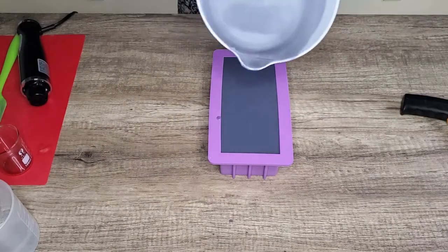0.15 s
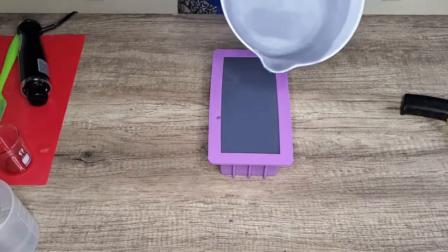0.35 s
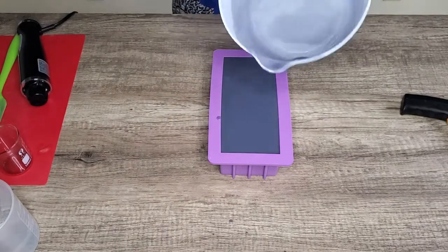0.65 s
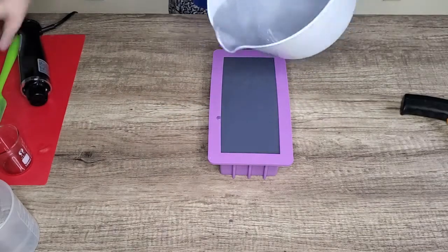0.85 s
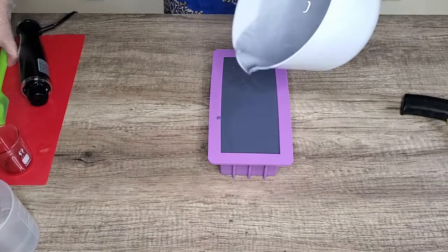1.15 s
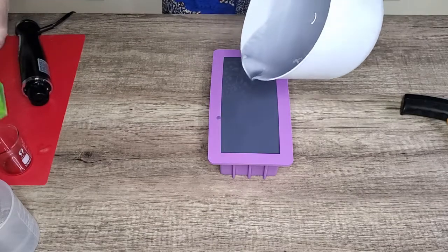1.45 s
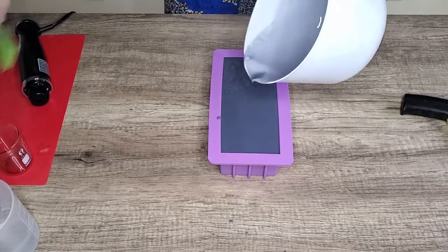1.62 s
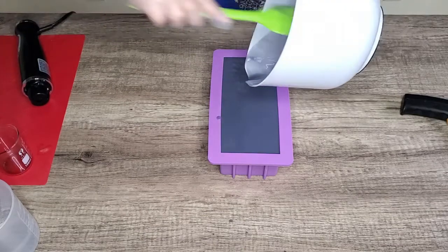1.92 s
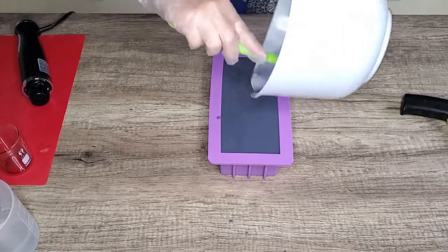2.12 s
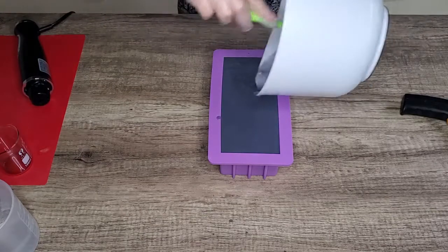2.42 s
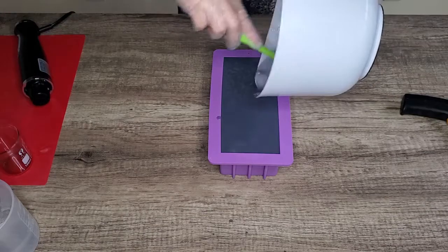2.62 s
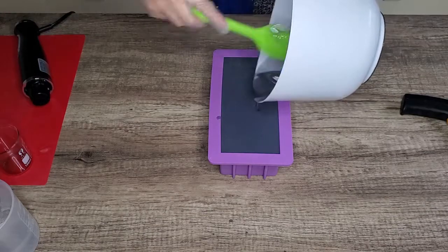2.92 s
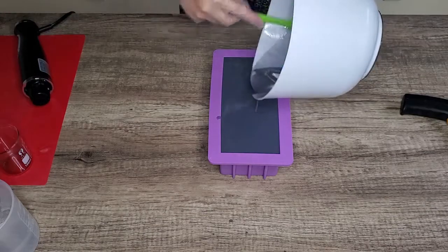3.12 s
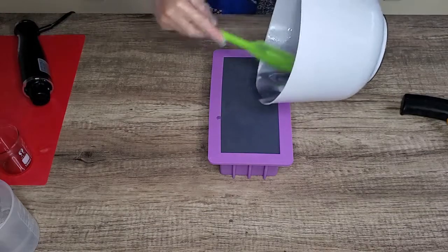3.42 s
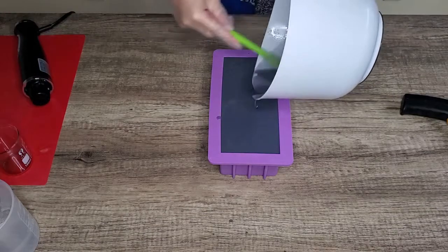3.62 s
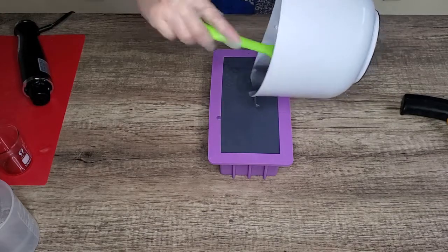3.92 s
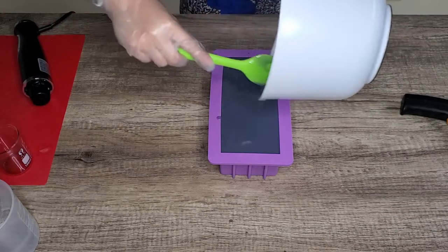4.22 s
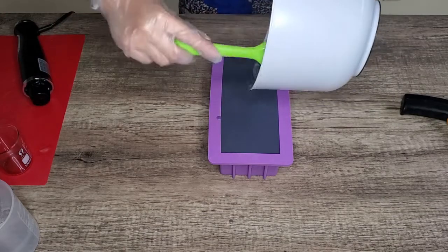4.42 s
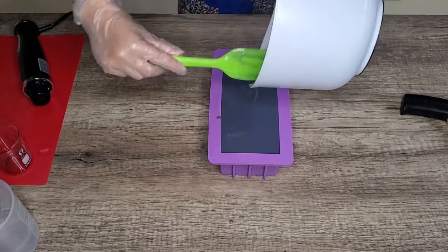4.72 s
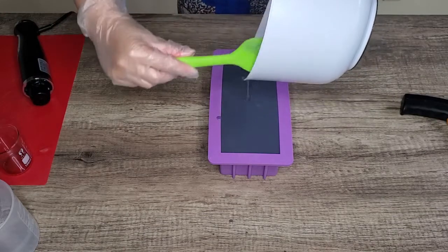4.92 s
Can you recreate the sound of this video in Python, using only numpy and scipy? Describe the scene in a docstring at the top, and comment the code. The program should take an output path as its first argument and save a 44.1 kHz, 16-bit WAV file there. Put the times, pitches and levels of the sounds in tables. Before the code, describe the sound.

Sleeves and gloves rustle softly as a plastic mixing bowl is tipped. A spatula is dragged off a mat with a sharp clack and a brief shudder. Its silicone blade then bumps the bowl about every half second in dull, hollow knocks, with a few thin clinks. Near the end the sliding blade makes the bowl hum briefly. The room is small, with low rumble and faint microphone hiss.

```python
"""Sleeves and gloves rustle as a cook tips a plastic mixing bowl over a mould. A spatula is dragged
off a mat with a clack and a shudder, then scrapes the bowl out: its silicone blade bumps the wall in
dull, ringing knocks that shake the table and that the small room carries on. A few thin clinks fall
among them, and near the end the sliding blade makes the wall hum.
A low room rumble and faint microphone hiss lie underneath."""
import sys
import numpy as np
from scipy import signal
from scipy.fft import rfft, irfft, next_fast_len
from scipy.io import wavfile

SR = 44100
rng = np.random.default_rng(int(sys.argv[2]) if len(sys.argv) > 2 else 0)


def file_out(sig):
    """Save sig as 16-bit WAV at sys.argv[1]."""
    # one column per channel
    cols = np.atleast_2d(sig).T
    # limit, then scale
    lim = np.clip(cols, -1, 1)
    pcm = np.round(lim * 32767).astype(np.int16)
    wavfile.write(sys.argv[1], SR, pcm)


N = 223078

THUD_HZ, RIM_HZ, CLACK_HZ = 181, 606, 1280
THUD_Q, KNOCK_Q, RIM_Q, CLACK_Q, TICK_Q = 1.78, 1.33, 3.43, 2.24, 2.37   # centre over width
BLADE_LAG_S = 0.001215   # the soft blade lands before its stiff core does
WALL_SWELL_S, SILICONE_CUTOFF_HZ = 0.032, 4100
# Modes of the bowl wall: f/Hz, level/dB, t60/s
WALL_MODES = [(337, -6, 0.29), (414.3, -3, 0.33), (443.4, 0, 0.18), (480.8, 0, 0.15), (502.1, -2.5, 0.39),
              (520, -9.5, 0.36), (638, 1.5, 0.034), (710, -11, 0.055), (946, -14.5, 0.055)]
# Spatula hits, each layer trimmed against the hit's level: t/s, level/dB, thud/dB, knock/dB,
# knock f/Hz, rim/dB, clack/dB, tick/dB, tick f/Hz, wall ring/dB, table shudder/dB, left over right/dB
HITS = [(0.664, -44, -1, 1.5, 500, -18, -2, -16, 2630, -31, -15, -3),
        (1.111, -29, -14.5, -11.5, 304, -8, -22, -5.5, 2500, -18, -34, 0),
        (2.122, -32, -3, 3, 291, -7, -4, 2, 2356, -24, -12.5, 2.5),
        (2.187, -71, -34, -15, 404, -27.5, -26, 4, 2240, -19, -9, 9),
        (2.562, -25.5, -50, 0, 648, -9, -31, -14, 1760, -1, -39.5, 2.5),
        (2.656, -48.5, -1.5, -21, 403, -21.5, -32.5, -24.5, 2500, -15.5, -13, 6),
        (3.155, -39.5, -5.5, 2.5, 285, -6.5, -5, 2.5, 2310, -18.5, -13.5, 3.5),
        (3.207, -56.5, -19, 2, 394, -5, 6.5, -8, 3340, -33, -22, -2),
        (3.692, -33, -11, 3.5, 282, -1.5, -3, -3.5, 2360, -18.5, -17.5, 3.5),
        (4.052, -41.5, -3.5, -1, 282, -8, -7.5, -11, 2300, -41, -12, 0.5),
        (4.525, -52.5, 1.5, -4.5, 725, -0.5, -16, -12.5, 2480, -18, -12.5, 2),
        (4.59, -61, -7, -19, 600, -24, -30, -10, 2460, -8, -9, 0),
        (4.729, -61.5, -22, -4, 685, -11, -4, -12, 2600, -11, -16, 5),
        (5.006, -46.5, -3, 2.5, 386, -7, -6, -28, 2700, -35, -17, 3)]
def bowl_knocks():
    """Each spatula hit is five heavily damped resonances plus the longer ring of the bowl wall."""
    out, clicks = np.zeros((2, N)), np.zeros(N)
    for s, level_db, *layers, ring_db, _, pan_db in HITS:
        thud_db, knock_db, knock_hz, rim_db, clack_db, tick_db, tick_hz = layers
        hit = from_db(thud_db) * blow(THUD_HZ, THUD_HZ / THUD_Q)
        hit += from_db(knock_db) * blow(knock_hz, knock_hz / KNOCK_Q)
        hit += from_db(rim_db) * blow(RIM_HZ, RIM_HZ / RIM_Q)
        clack = from_db(clack_db) * blow(CLACK_HZ, CLACK_HZ / CLACK_Q)
        tick = from_db(tick_db) * blow(tick_hz, tick_hz / TICK_Q)
        add(hit, BLADE_LAG_S, tick - clack)   # opposite signs, so no hole opens between them
        pan = np.array([[.5], [-.5]]) * pan_db
        add(out, s, -hit * from_db(level_db + pan))
        clicks[round(s * SR)] = from_db(level_db + ring_db)
    # the batter-coated wall takes a moment to come up to full swing
    wall = sum(from_db(db) * (ring(clicks, hz, t60) - ring(clicks, hz, WALL_SWELL_S))
               for hz, db, t60 in WALL_MODES)
    # a free wall radiates no deep bass
    out += signal.sosfilt(signal.butter(3, [300, 1100], "band", fs=SR, output="sos"), wall)
    # soft silicone excites no treble
    return signal.sosfilt(signal.butter(4, SILICONE_CUTOFF_HZ, fs=SR, output="sos"), out)


# Tone of the shaken table top: f/Hz, level/dB
TABLE_TONE = [(50, -3), (76, 0.5), (110, -3.5), (160, -20.5)]
def table_shudder():
    """Every knock sends a brief low shudder through the table top."""
    envelope = sum(from_db(level_db + shudder_db) * swell(s + 0.0046, rise=1500, hold_s=0, fall=167)
                   for s, level_db, *_, shudder_db, _ in HITS)
    return envelope * stereo_noise(TABLE_TONE)


# Tones of the drag's four layers: f/Hz, level/dB
SHUDDER_TONE = [(55, -7), (75, 0), (130, -18), (245, 1), (280, -16), (320, 3.5), (420, -18.5), (700, -51)]
RATTLE_TONE = [(360, -15), (430, 6.5), (510, -9.5), (600, 7.5), (700, -7.5), (800, 2.5), (900, -10),
               (1000, 1), (1130, -16), (1270, -8.5), (1600, -8.5), (2200, -24)]
CLACK_TONE = [(1800, -16.5), (2400, -10.5), (2750, -1), (3100, -9.5), (3450, -5), (4000, -48)]
DRAG_HISS_TONE = [(2240, -44), (3800, -1.5), (6870, -9.5), (10200, -11), (13000, -17.5), (14000, -23),
                  (15700, -20)]
# Release of shudder, rattle, clack and hiss: fall/(dB/s) each
DRAG_RELEASES = [166, 166, 140.4, 184]
# Four jerks off the mat: t/s, rise/(dB/s), hold/s, shudder/dB, rattle/dB, clack/dB, hiss/dB
JERKS = [(1.045, 9000, 0.026, -45.5, -49, -44.5, -51), (1.108, 1504, 0.017, -40, -67, -66, -60),
         (1.163, 400, 0.01, -61, -46, -58.5, -57.5), (1.185, 302, 0.027, -44, -43.5, -73, -65.5)]
def spatula_drag():
    """The handle clacks and the table top and mat shudder while the spatula comes away."""
    tones = SHUDDER_TONE, RATTLE_TONE, CLACK_TONE, DRAG_HISS_TONE
    out = 0
    for layer, (tone, fall) in enumerate(zip(tones, DRAG_RELEASES)):
        power = sum((from_db(levels_db[layer]) * swell(s, rise, hold_s, fall)) ** 2
                    for s, rise, hold_s, *levels_db in JERKS)
        out = out + np.sqrt(power) * stereo_noise(tone)
    flutter = from_db(1.05 * drift(54))
    return flutter * out


# Thin, bright contacts: t/s, level/dB, f/Hz, width/Hz
CLINK_HITS = [(0.986, -55.5, 9700, 3000), (1.044, -29.5, 4900, 3000), (2.189, -54, 4530, 3000),
              (3.156, -65.5, 3620, 900), (2.643, -56.5, 3620, 700), (2.643, -56, 9460, 704),
              (2.679, -76, 9500, 690), (3.208, -66, 5000, 1500)]
def clinks():
    """Tiny hard contacts each strike one high, short resonance."""
    out = np.zeros(N)
    for s, level_db, hz, width_hz in CLINK_HITS:
        add(out, s, from_db(level_db) * blow(hz, width_hz))
    return out


RASP_EDGE_RATIO, RASP_EDGE_DB = 0.59, -9   # the rasp band's edges against its centre
# Tones of the cloth, its body and the air on top: f/Hz, level/dB
CLOTH_BODY = [(900, -15), (1500, -4.5), (2200, -4), (2750, 0.5), (3150, -10), (3650, -1.5), (4300, -6.5),
              (5800, -8), (6600, -5), (7300, -9), (9000, -14), (15000, -9.5)]
CLOTH_AIR = [(4000, -17.5), (6500, -16), (9000, -3), (12000, -4), (16500, -17.5)]
# Sleeve and glove rubs, air and rasp trimmed against the level:
# t/s at full level, rise/(dB/s), hold/s, level/dB, air/dB, rasp f/Hz, rasp/dB
CLOTH_RUBS = [(0.076, 88, 0.09, -61, -4, 3270, 4.5), (0.256, 55, 0.11, -65, -4.5, 2730, -1.5),
              (0.403, 75, 0.03, -63.5, -7, 3250, 0), (0.548, 202, 0.048, -58, -3.5, 3250, -1.5),
              (0.662, 204, 0.012, -52, -4.5, 3430, -4.5), (0.902, 98, 0.04, -73.5, -1, 3880, -0.5),
              (1.39, 117, 0.017, -70.5, 1.5, 4970, 4.5), (1.523, 100, 0.037, -86, 1, 5130, 8.5),
              (1.682, 250, 0.045, -90, 2, 5000, 13.5), (1.862, 400, 0.02, -79, -17, 5500, 9),
              (1.894, 200, 0.027, -78, 0, 4000, 10), (2.197, 297, 0.02, -81, 2, 2510, 11.5)]
def cloth_rustle():
    """Fibres slide over each other: each rub is fluttering hiss with its own rasp and share of air."""
    lean_left = from_db([[1.5], [-1.5]])
    body = stereo_noise(CLOTH_BODY) * from_db(1.06 * drift(26)) * lean_left
    air = stereo_noise(CLOTH_AIR) * from_db(1.1 * drift(25))
    body_power, air_power, rasp = 0, 0, 0
    for s, rise, hold_s, level_db, air_db, hz, rasp_db in CLOTH_RUBS:
        envelope = from_db(level_db) * swell(s, rise, hold_s, fall=183)
        body_power += envelope ** 2
        air_power += (envelope * from_db(air_db)) ** 2
        rasp_tone = [(hz * RASP_EDGE_RATIO, RASP_EDGE_DB), (hz, 0), (hz / RASP_EDGE_RATIO, RASP_EDGE_DB)]
        rasp += envelope * from_db(rasp_db) * stereo_noise(rasp_tone)
    return rasp + np.sqrt(body_power) * body + np.sqrt(air_power) * air


# Tones of the wall's lower and upper hum, one list each: f/Hz, level/dB
HUM_TONES = [
    [(480, -13), (545, 34), (610, -28)],
    [(650, -30), (740, 23), (830, -30)],
]
# Blade strokes along the wall: t/s, rise/(dB/s), hold/s, lower hum/dB, upper hum/dB
STROKES = [(4.253, 2000, 0.11, -98, -79), (4.397, 200, 0.089, -70.5, -89)]
def blade_slide():
    """Friction of the blade feeds two resonances of the wall."""
    lower, upper = [stereo_noise(tone) for tone in HUM_TONES]
    out = 0
    for s, rise, hold_s, lower_db, upper_db in STROKES:
        hum = from_db(lower_db) * lower + from_db(upper_db) * upper
        out += swell(s, rise, hold_s, fall=290) * hum
    return out


ROOM_RISE_S, ROOM_FADE_S = 0.00064, 0.41
EARLY_BOOST, EARLY_S = 0.14, 0.004
BAND_EDGES_HZ = 25 * 2 ** np.arange(0, 9.7, 1 / 3)   # third octaves
# Decay of the small room, before the late fade: f/Hz, t60/s
ROOM_DECAY = [(100, 0.19), (400, 0.43), (1500, 0.43), (3500, 0.39), (5000, 0.36), (10000, 0.4)]
def room(sound):
    """Dense reflections build up quickly and die band by band; they change as the bowl is moved."""
    t = np.arange(SR // 2) / SR
    hit_times = np.array(HITS)[:, 0]
    # a fresh echo pattern starts just ahead of each knock that follows a pause
    changes = [int((s - .005) * SR) for s, gap in zip(hit_times[1:], np.diff(hit_times)) if gap > .25]
    bounds = [0] + changes + [N]
    noise = stereo_noise([(55, 0), (18000, 0)])
    offsets = np.arange(len(bounds)) * (N // len(bounds))
    patterns = np.array([np.roll(noise, -at, axis=1)[:, :len(t)] for at in offsets])
    tails = 0
    for low, high in zip(BAND_EDGES_HZ, BAND_EDGES_HZ[1:]):
        band = signal.sosfilt(signal.butter(2, [low, high], "band", fs=SR, output="sos"), patterns)
        t60 = at_hz(ROOM_DECAY, np.sqrt(low * high))
        tails += band * from_db(-60 * t / t60)
    tails *= 1 - np.exp(-t / ROOM_RISE_S)
    tails *= np.exp(-2 * (t / ROOM_FADE_S) ** 2)   # the late tail falls faster
    tails *= 1 + EARLY_BOOST * np.exp(-t / EARLY_S)   # strong first echoes off the table and bowl
    send = sound.mean(axis=0, keepdims=True)
    out = np.zeros((2, N))
    for start, end, tail in zip(bounds, bounds[1:], tails):
        add(out, start / SR, signal.fftconvolve(send[:, start:end], tail, axes=1))
    return out


# Tones of the rumble's body and its sub: f/Hz, level/dB
RUMBLE_BODY = [(90, -15.5), (125, -4.5), (190, 0), (220, -4), (250, -1.5), (320, -2.5), (460, -12),
               (525, -2.5), (620, -14), (730, -8.5), (950, -24), (1300, -20), (1800, -31), (2600, -32.5)]
RUMBLE_SUB = [(27, -3.5), (35, 1.5), (45, -7.5), (60, -16), (76, -3.5), (90, -17), (110, -16.5)]
# Fader ride of the rumble, louder while the bowl is being shifted: t/s, body/dB, sub/dB
RUMBLE_RIDE = [(0.0, -67, -63.5), (0.15, -63.5, -55), (0.35, -61, -59), (0.49, -66, -63), (0.6, -59.5, -59),
               (0.8, -61, -56), (1.0, -62, -63.5), (1.2, -60, -59), (1.38, -61.5, -67), (1.6, -64.5, -64.5),
               (2.2, -66.5, -64), (2.5, -68.5, -72), (2.68, -57, -57.5), (2.8, -67, -70),
               (3.3, -66.5, -61.5), (3.62, -67.5, -66.5), (4.1, -68.5, -67), (4.7, -68.5, -66),
               (5.06, -64, -64.5)]
def house_rumble():
    """The house rumbles: a lumpy body of low noise over a deep sub."""
    body_db, sub_db = in_time(RUMBLE_RIDE)
    body = from_db(body_db + 1.5 * drift(6)) * stereo_noise(RUMBLE_BODY)
    return body + from_db(sub_db) * stereo_noise(RUMBLE_SUB)


# Tone of the microphone's noise floor: f/Hz, level/dB
MIC_TONE = [(880, -39), (1500, -20), (1670, -0.5), (1970, -22), (2070, -8.5), (2680, -7), (3850, -7.5),
            (5540, -11), (6610, -9.5), (7430, -15), (11000, -11), (15700, -10.5)]
def microphone_hiss():
    """The microphone adds a faint, steady hiss of its own."""
    return from_db(-82) * stereo_noise(MIC_TONE)


# Stereo image, near mono in the bass and wide in the treble: f/Hz, left-right correlation
STEREO_IMAGE = [(30, 0.96), (125, 0.81), (350, 0.86), (600, 0.5), (900, 0.2), (1200, 0.033), (4000, 0.034),
                (12000, 0.054)]
def stereo_noise(tone):
    """Stereo noise of rms 1; the tone curve shapes its spectrum, which is empty beyond the ends."""
    size = next_fast_len(N)
    hz = np.maximum(np.arange(size // 2 + 1) * SR / size, 1)
    inside = (hz > tone[0][0]) & (hz < tone[-1][0])
    mid, side = rfft(rng.standard_normal((2, size))) * from_db(at_hz(tone, hz)) * inside
    alike = np.clip(at_hz(STEREO_IMAGE, hz), 0, 1)
    mid, side = mid * np.sqrt(1 + alike), side * np.sqrt(1 - alike)
    return rms_one(irfft(np.array([mid + side, mid - side]), size)[:, :N])


def ring(clicks, hz, t60):
    """A unit click sets a decaying sine of height 1 ringing."""
    r, w = from_db(-60 / (t60 * SR)), 2 * np.pi * hz / SR
    return signal.lfilter([0, np.sin(w)], [1, -2 * r * np.cos(w), r * r], clicks + 1e-18)


def blow(hz, width_hz):
    """A click through a heavily damped resonance, twice for steep skirts; peak 1."""
    click = signal.unit_impulse(2048)
    t60 = np.log(1000) / (np.pi * width_hz)
    shape = np.gradient(ring(ring(click, hz, t60), hz, t60))   # a small body radiates no steady push
    return shape / np.abs(shape).max()


def swell(s, rise, hold_s, fall):
    """Envelope that climbs to 1 at time s, holds and falls away, on straight slopes in dB per second."""
    t = np.arange(N) / SR - s
    attack_db = rise * np.minimum(t, 0)
    release_db = fall * np.minimum(hold_s - t, 0)
    return from_db(np.maximum(np.minimum(attack_db, release_db), -200))


def drift(rate_hz):
    """Smooth random wobble of spread about 1, rolling off above the rate."""
    step, settle = 40, 2000
    r = np.exp(-2 * np.pi * rate_hz * step / SR)
    slow = signal.lfilter([1], [1, -2 * r, r * r], rng.standard_normal(N // step + settle + 2))[settle:]
    return np.interp(np.arange(N) / step, np.arange(len(slow)), rms_one(slow))


def from_db(db):
    """Gain of a level in dB."""
    return 10 ** (np.asarray(db) / 20)


def rms_one(x):
    """Scales to rms 1."""
    return x / np.sqrt(np.mean(x ** 2) + 1e-20)


def in_time(rows):
    """Columns of a fader ride, one value per sample."""
    s, *columns = np.transpose(rows)
    return [np.interp(np.arange(N) / SR, s, column) for column in columns]


def at_hz(curve, hz):
    """Reads a curve on a log-frequency axis."""
    curve_hz, values = np.transpose(curve)
    return np.interp(np.log(hz), np.log(curve_hz), values)


def add(out, s, sound):
    """Mixes a short sound in at time s."""
    at = round(s * SR)
    out[..., at:at + sound.shape[-1]] += sound[..., :out.shape[-1] - at]


def scene():
    """Knocks and clinks feed the room; the other layers stay dry, over a bed of rumble and hiss."""
    contacts = bowl_knocks() + clinks()
    in_room = from_db(-2.5) * contacts + from_db(-20) * room(contacts)
    handling = table_shudder() + cloth_rustle() + spatula_drag() + blade_slide()
    return in_room + handling + house_rumble() + microphone_hiss()


def record(dry):
    """A steep high cut takes off the very top."""
    cutoff_hz = 15800
    return signal.sosfilt(signal.ellip(14, .5, 60, cutoff_hz, fs=SR, output="sos"), dry)


dry = scene()
out = record(dry)
file_out(out)
```